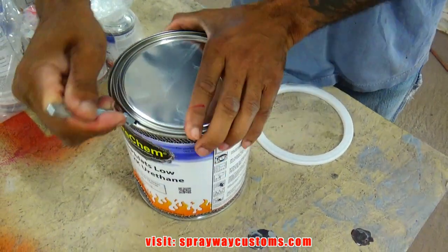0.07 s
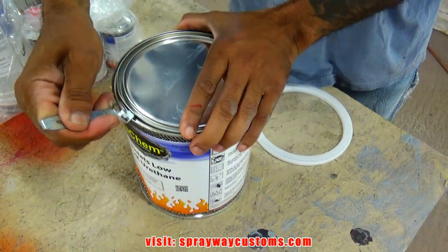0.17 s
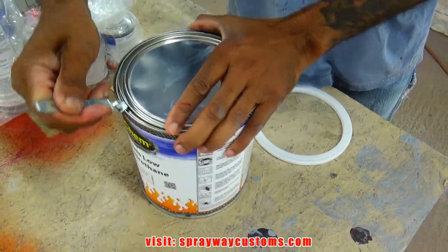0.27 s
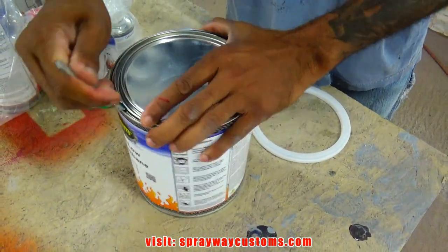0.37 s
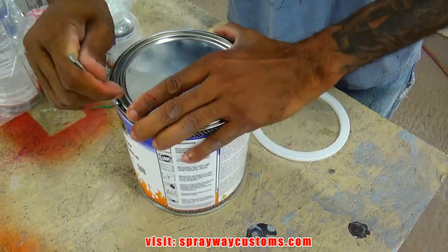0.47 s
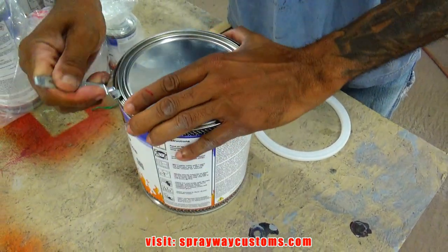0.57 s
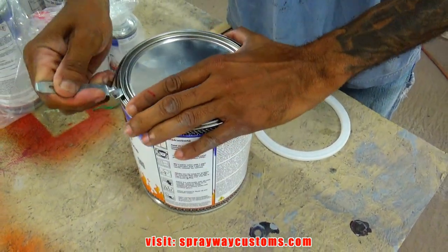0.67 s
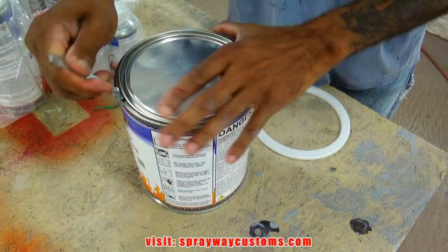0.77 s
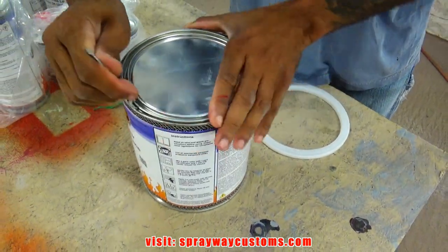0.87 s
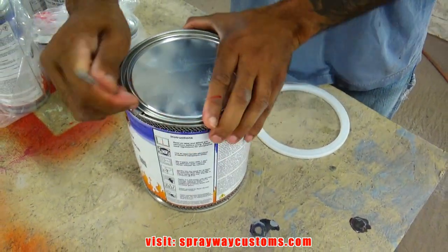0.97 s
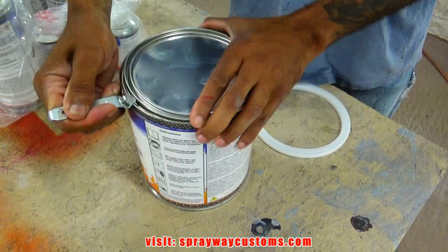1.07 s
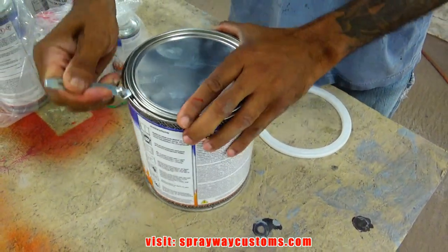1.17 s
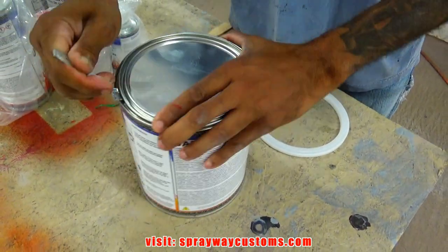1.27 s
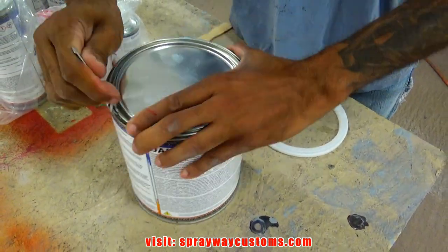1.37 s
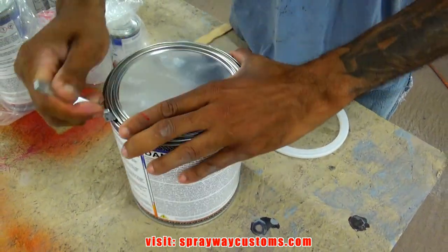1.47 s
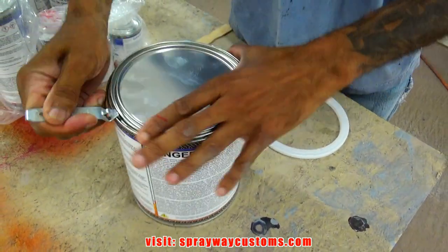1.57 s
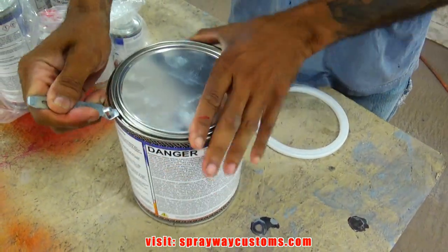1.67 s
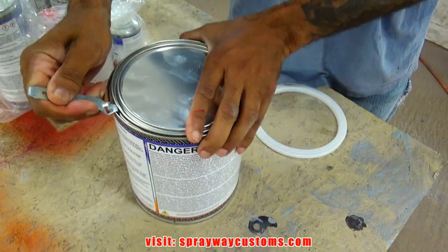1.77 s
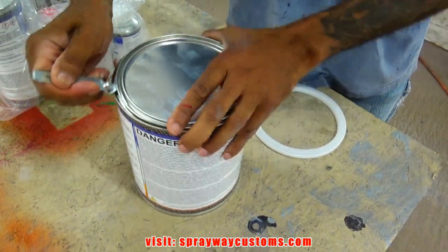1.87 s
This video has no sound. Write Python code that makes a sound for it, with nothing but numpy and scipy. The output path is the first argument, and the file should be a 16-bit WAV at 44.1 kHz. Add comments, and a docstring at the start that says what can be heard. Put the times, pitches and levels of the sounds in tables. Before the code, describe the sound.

Paint can lid pried loose, heard close in a small workshop with steady hiss: short metal scrapes and clicks, a ringing pop, rasping, another drier pop with a sharp squeaky stroke, then can drags and thuds on the bench.

```python
"""A steel opener pries round the rim of a paint can, heard close by in a quiet workshop with steady hiss and hum.
It scrapes (friction grains through resonances), squeaks (narrow noise), ticks (noise cracks with a rim mode)
and bumps the bench (damped sines); then the lid pops loudly (damped modes and a dense clang) under a hand.
More scraping leads to a second loud pop and a brisk stroke; the can drags and bumps on the bench.
Dull knocks of the full can (a blow and damped modes), light ticks and short scrapes end the scene."""
import sys
import numpy as np
from scipy import signal
from scipy.fft import rfft, irfft, next_fast_len
from scipy.io import wavfile

SR = 44100
rng = np.random.default_rng(int(sys.argv[2]) if len(sys.argv) > 2 else 0)


def boost(x):
    """Linear amplitude factor 10**(x/20) for a level x in decibels (scalar or array-like)."""
    u = np.asarray(x, float) / 20
    return 10 ** u


def wav_out(sig):
    """Save sig, one row per channel (or a flat mono array), as 16-bit PCM at SR to the path in sys.argv[1]."""
    wavfile.write(sys.argv[1], SR, np.round(np.clip(np.atleast_2d(sig).T, -1, 1) * 32767).astype(np.int16))


N = 83790

# modes of the lid: (frequency [Hz], level [dB], 60 dB decay time before scaling [s])
LID_MODES = [(547.7, -9, 0.17), (692, 2, 0.12), (729, -17, 0.32), (796, -21, 0.18), (866, -13.5, 0.23),
             (924, -21.5, 0.3), (1094, -17, 0.18), (1145.4, -20.5, 0.2), (1250, -14, 0.14),
             (1400, -13, .12), (1452, -13, 0.11), (1640, -38, 0.13), (1745, -9, 0.079), (1860, -26, 0.13),
             (2014, -15.5, 0.085), (2066, -21.5, 0.15), (2410, -19.5, 0.08)]
CONTACT_RISE_S = 0.00043  # time constant of a steel contact


def unit(x):
    """Normalisation to unit root-mean-square value."""
    return x / np.sqrt(np.mean(x ** 2) + 1e-20)


def along(points, hz):
    """Linear interpolation of (frequency [Hz], value) points on a logarithmic frequency axis."""
    point_hz, values = np.transpose(points)
    return np.interp(np.log(hz + 1), np.log(point_hz + 1), values)


def filtered(x, response):
    """Linear filtering: the spectrum is multiplied by a complex response of frequency."""
    n = x.shape[-1]
    size = next_fast_len(n + 8192)  # zero padding leaves room for the filter's tail
    return irfft(rfft(x, size) * response(np.fft.rfftfreq(size, 1 / SR)), size)[..., :n]


def burst(spectrum, tilt_db, t60, t):
    """Impulsive excitation: coloured noise rises fast and decays exponentially."""
    def colour(hz):
        octaves = np.log2(np.maximum(hz, 600) / 2000)
        return boost(along(spectrum, hz) + tilt_db * octaves)

    noise = filtered(rng.standard_normal(len(t)), colour)
    return unit(noise) * boost(-60 * t / t60) * (1 - np.exp(-t / CONTACT_RISE_S))


def add(track, start_s, sound):
    """Superposition: a sound is summed into the track at its start time."""
    track[round(start_s * SR):][:len(sound)] += sound


def ring(modes, pitch, life, tilt_db, t):
    """Modal synthesis: damped sines started by a short push; the tilt [dB/octave] acts above 692 Hz."""
    tones = 0
    for hz, db, t60 in modes:
        octaves = max(np.log2(hz / 692), 0)
        envelope = boost(db + tilt_db * octaves - 60 * t / (t60 * life))
        tones = tones + envelope * np.sin(2 * np.pi * hz * pitch * t)
    return tones * (1 - np.exp(-t / 0.0011))  # contact time constant [s]


def level(tables, column):
    """Power addition of stroke envelopes, each interpolated in dB and -120 dB outside its stroke."""
    t = np.arange(N) / SR
    power = 0
    for rows in tables:
        times = [row[0] for row in rows]
        levels_db = [row[column] for row in rows]
        power = power + boost(np.interp(t, times, levels_db, -120, -120)) ** 2
    return np.sqrt(power)


def air():
    """Stationary broadband hiss, partly correlated between channels, with a faint tonal hum."""
    # room hiss: (frequency [Hz], relative spectral density [dB])
    hiss_spectrum = [(15, -32), (25, -13), (149, 1.5), (236, -1.5), (285, -5.5), (936, -8.5), (1260, -11),
                     (5280, -16.5), (8140, -15.5), (8830, -13.5), (16000, -29.5)]
    # hum partials: (frequency [Hz], level before a 6 dB cut [dB])
    hum_partials = [(95, -61), (184, -66)]
    hiss_db, correlation = -52.5, 0.93
    common, opposed = filtered(rng.standard_normal((2, N)), lambda hz: boost(along(hiss_spectrum, hz)))
    angle = np.arccos(correlation) / 2
    hiss = np.cos(angle) * common + np.sin(angle) * opposed * [[1], [-1]]
    t = np.arange(N) / SR
    hum = sum(boost(db - 6) * np.sin(2 * np.pi * hz * t) for hz, db in hum_partials)
    return boost(hiss_db) * unit(hiss) + hum


def scrape():
    """Friction: dense random grains excite the resonances of steel, lid and bench."""
    # scraping and dragging strokes: (time [s], treble [dB], middle [dB], lid ring [dB], bench rumble [dB])
    strokes = [
        [(0.0, -50, -51, -36.5, -57), (0.012, -41.5, -38, -42.5, -60), (0.024, -38, -34, -57, -72),
         (0.036, -41, -39, -54, -53), (0.052, -43, -42, -42, -43.5), (0.074, -53, -54, -60, -54),
         (0.086, -49, -54, -68, -63), (0.098, -56, -76, -70, -68), (0.128, -65, -79, -69, -69),
         (0.15, -71, -73, -73, -78)],
        [(0.465, -36, -31, -31, -33), (0.473, -37, -33.5, -35.5, -36), (0.491, -30.5, -34, -32, -42),
         (0.517, -33.5, -32.5, -48, -80), (0.549, -42, -36, -33, -62), (0.563, -49, -46, -48, -70),
         (0.577, -48.5, -47, -59, -75), (0.597, -54, -53, -61, -64), (0.62, -51.5, -59, -53, -68)],
        [(0.8, -85, -83, -66, -65), (0.848, -49, -60, -55, -71), (0.858, -49, -70, -87, -77),
         (0.872, -58, -50, -53, -52), (0.894, -63, -82, -53, -65), (0.902, -42, -39, -46, -43),
         (0.942, -34.5, -42, -57, -102), (0.96, -39, -35, -52, -49), (0.988, -49, -39.5, -37.5, -50),
         (1.018, -48.5, -46.5, -57, -80), (1.05, -44.5, -43.5, -71, -79), (1.074, -62, -56, -51, -48),
         (1.104, -70, -62, -56, -64), (1.12, -60, -46, -56, -33)],
        [(1.183, -45, -33, -37, -61), (1.193, -19.5, -30.5, -38, -35), (1.211, -17, -27, -46, -56),
         (1.232, -43, -41, -52, -40)],
        [(1.232, -37, -36, -66, -41), (1.284, -47.5, -51.5, -65, -56), (1.33, -47.5, -51.5, -49, -55),
         (1.354, -48, -46.5, -49.5, -42), (1.384, -38.5, -37.5, -50, -38.5), (1.402, -39, -40.5, -31, -40.5),
         (1.414, -33.5, -30.5, -45.5, -38), (1.436, -33.5, -35.5, -36.5, -41), (1.472, -35.5, -33.5, -41, -46),
         (1.488, -39.5, -39, -65, -43), (1.504, -38.5, -42, -41.5, -38.5), (1.528, -54, -52, -48, -46),
         (1.55, -47.5, -46, -44.5, -45.5), (1.58, -57, -52, -75, -69)],
        [(1.67, -65, -62, -42.5, -50), (1.684, -58, -72, -58, -59), (1.698, -52, -67, -56, -64),
         (1.712, -55, -65, -51, -63), (1.722, -48.5, -52, -61, -54), (1.74, -37.5, -46, -54, -57),
         (1.752, -42, -46, -55, -58), (1.764, -43, -49.5, -57, -51), (1.778, -50, -88, -63, -58),
         (1.788, -53, -55, -43.5, -50), (1.804, -47, -78, -76, -51)],
        [(1.862, -53, -54, -54, -58), (1.876, -42, -50, -41.5, -49), (1.9, -40, -40.5, -40, -52.5)],
    ]
    # faint scrapes after the pops and knocks: (time [s], treble [dB], middle [dB])
    rustles = [
        [(0.24, -52, -68), (0.272, -67, -76), (0.274, -60, -74), (0.324, -52, -50), (0.332, -65, -45)],
        [(0.355, -64, -40), (0.395, -49, -37), (0.441, -45.5, -40), (0.445, -39, -47)],
        [(1.155, -49, -20), (1.165, -43, -32), (1.183, -41, -31)],
        [(1.6, -60, -41.5), (1.638, -49.5, -49.5), (1.648, -62, -49), (1.67, -59, -61)],
        [(1.835, -52, -48.5), (1.857, -55, -56), (1.862, -47, -61)],
    ]
    # colours of treble, middle and bench rumble: (frequency [Hz], relative spectral density [dB])
    fizz_spectrum = [(2350, -70), (4000, -6.5), (4490, -9), (4900, -2), (6250, -8), (6780, -8.5),
                     (7140, -1.5), (12200, -8), (16000, -30)]
    rasp_spectrum = [(530, -3), (900, 1.5), (1990, 4), (2450, 2), (3950, -1.5), (4800, -4.5), (6240, -79),
                     (10600, -120)]
    drone_spectrum = [(59, -55), (100, -14), (172, -2.5), (402, -12.5), (480, -3), (620, -5.5),
                      (1060, -120)]
    # resonances of rim and tool: (frequency [Hz], width [Hz], level before the common gain [dB])
    steel_modes = [(1680, 4.3, 6), (3127, 160, -4.5), (4670, 71, -21), (6070, 63, 0), (6620, 29, 7),
                   (8040, 130, -3), (8180, 110, -14), (8900, 180, -2.5), (10350, 190, -10)]
    steel_db, rasp_ring_db = 3, 4.5  # common gain of the steel modes; lid modes in the rasp
    grains_per_s, grain_spread_db = 6000, 2
    rub_widens = 4.3  # the hand on the lid broadens its modes

    def peak(hz, centre, width):
        return width * np.abs(hz / (centre ** 2 - hz ** 2 + 1j * hz * width))

    def steel(hz):
        return 1 + boost(steel_db) * sum(boost(db) * peak(hz, c, width) for c, width, db in steel_modes)

    def lid_response(hz):
        total = 0
        for centre, db, t60 in LID_MODES:
            width = rub_widens * np.log(1000) / np.pi / t60
            total = total + boost(db) * peak(hz, centre, width) ** 2
        return total

    def coloured(source, spectrum):
        return unit(filtered(source, lambda hz: boost(along(spectrum, hz)) * steel(hz)))

    hits = rng.random((4, N)) < grains_per_s / SR
    sizes = boost(grain_spread_db * rng.exponential(size=N)) * rng.standard_normal(N)
    grains = hits * sizes
    grains = grains + grains.std() * rng.standard_normal((4, N))  # equally strong even hiss
    fizz = coloured(grains[0], fizz_spectrum)
    rasp = coloured(grains[1], rasp_spectrum)
    drone = coloured(grains[2], drone_spectrum)
    rasp = unit(filtered(rasp, lambda hz: 1 + boost(rasp_ring_db) * np.sqrt(lid_response(hz))))
    rub = unit(filtered(grains[3], lid_response))
    bright = fizz * level(strokes + rustles, column=1) + rasp * level(strokes + rustles, column=2)
    return bright + rub * level(strokes, column=3) + drone * level(strokes, column=4)


def squeaks():
    """Resonant friction: one narrow noise band swells and fades while the tool slides."""
    # squeaks: (centre [s], length [s], frequency [Hz], width [Hz], level at the centre [dB])
    squeak_bands = [(0.015, 0.038, 9430, 295, -41), (0.519, 0.059, 5650, 348, -35),
                    (0.982, 0.02, 4730, 250, -45), (1.023, 0.075, 9150, 500, -46),
                    (1.205, 0.033, 6650, 246, -20.5), (1.202, 0.018, 7700, 250, -30),
                    (1.42, 0.043, 8180, 300, -31.5), (1.43, 0.061, 4670, 250, -35.5),
                    (1.472, 0.032, 1680, 100, -34.5), (1.763, 0.059, 1296, 79.6, -50)]
    t = np.arange(N) / SR
    out = np.zeros(N)
    for centre_s, length_s, hz, width, db in squeak_bands:
        noise = rng.standard_normal(N)
        band = unit(filtered(noise, lambda f: 1 / (1 + (2 * (f - hz) / width) ** 2)))
        out += boost(db) * band * np.exp(-2 * ((t - centre_s) / (length_s / 2)) ** 2)
    return out


def shop(x):
    """Reverberation: convolution with decaying noise in which each frequency dies at its own speed."""
    # decay of the workshop: (frequency [Hz], 60 dB decay time [s])
    decay = [(200, 0.14), (2000, 0.52), (10000, 0.15)]
    hz, t, bins = signal.stft(rng.standard_normal((2, SR // 2)), SR, nperseg=256)
    fade = boost(-60 * t / along(decay, hz)[:, None])
    tail = signal.istft(bins * fade, SR, nperseg=256)[1]
    tail = tail / np.linalg.norm(tail[0])
    delayed = np.pad(x, (300, 0))  # delay in samples
    return signal.fftconvolve(delayed[None], tail, axes=1)[:, :N]


def opener():
    """Impact of steel on steel: short bright noise cracks, each with one damped mode of the rim."""
    # ticks: (time [s], level before a 7.5 dB cut [dB], crack decay [s], brightness [dB/octave], rim mode [Hz])
    ticks = [(0.0226, -20, 0.024, -2, 1426), (0.036, -20, 0.016, 21, 1480),
             (0.1785, -24.5, 0.028, -3.5, 3550), (0.195, -12.5, 0.013, -5, 1824),
             (0.22, -18.5, 0.019, -5.5, 1390), (0.277, -35, 0.013, 2, 7860), (0.32, -33, 0.011, 9, 7500),
             (.345, -1, 0.017, -6, 2220), (0.4474, -10.5, 0.023, -3.3, 1770),
             (0.4552, -0.5, 0.017, 2, 8900), (0.6314, -25.5, 0.014, -3.5, 1680),
             (0.662, -19, 0.011, 7, 3010), (0.732, -32.5, 0.013, -1, 6700),
             (0.838, -30.5, 0.016, 0.5, 9130), (.872, -31.5, 0.014, 7, 4450),
             (0.9024, -20.5, 0.028, 2.5, 5940), (.976, -24, 0.045, 2, 4750), (1.0447, -28, 0.014, 1, 11800),
             (1.077, -32.5, 0.017, -7, 9700), (1.124, -25, 0.025, 2, 1660),
             (1.1463, -2.5, 0.026, -4.5, 2920), (1.5052, -18, 0.0065, -3.5, 3190),
             (1.5857, -17, 0.0055, -4, 1285), (1.5897, -22.5, 0.044, -2.5, 2820),
             (1.6091, -16.5, 0.011, -6, 1330), (1.722, -27, 0.01, 5, 2300), (1.735, -23, 0.016, 3.5, 2600),
             (1.8265, -18.5, 0.0078, -4, 1236), (1.8753, -31, 0.012, -1.5, 1150)]
    # colour of a crack: (frequency [Hz], relative spectral density [dB])
    crack_spectrum = [(300, -42), (650, -18), (1100, -8), (2880, -10), (3940, -7), (4880, -14.5),
                      (9040, -7.5), (10100, -10), (10900, -10), (16000, -34)]
    rim_db, rim_t60_s = -7, 0.033
    out, t = np.zeros(N + SR), np.arange(SR // 10) / SR
    for start_s, db, t60, tilt_db, hz in ticks:
        rim = boost(rim_db - 60 * t / rim_t60_s) * np.sin(2 * np.pi * hz * t)
        crack = burst(crack_spectrum, tilt_db, t60, t)
        add(out, start_s, boost(db - 7.5) * (crack + rim))
    return out[:N]


def knocks():
    """Impact on a heavily damped body: one short blow with the decaying modes of the full can."""
    # knocks: (time [s], level [dB], pitch factor, ring length factor, blow level relative to the ring [dB])
    can_knocks = [(.039, -32, 0.835, 0.43, -10), (1.587, -36, 1.02, 0.44, -8),
                  (1.608, -30.5, 1.1, 0.56, -3), (1.632, -22, .86, 0.42, -16),
                  (1.8244, -26.5, 0.95, 0.82, 20)]
    # modes of the full can: (frequency before scaling [Hz], level [dB], 60 dB decay time before scaling [s])
    can_modes = [(225, -9.5, .12), (480, 0, 0.088), (583, 0.5, 0.17), (756, -3.5, 0.097),
                 (1260, -13.5, 0.12)]
    blow_hz, blow_t60_s = 810, 0.0044
    out, t = np.zeros(N + SR), np.arange(SR // 4) / SR
    blow = -boost(-60 * t / blow_t60_s) * np.sin(2 * np.pi * blow_hz * t)
    blow = blow * (1 - np.exp(-t / CONTACT_RISE_S))
    for start_s, db, pitch, life, blow_db in can_knocks:
        body = ring(can_modes, pitch, life, 0, t)
        add(out, start_s, boost(db) * (body + boost(blow_db) * blow))
    return out[:N]


def bench():
    """Soft impact: the can excites damped low modes of the board with a gradual onset."""
    # bumps of the can on the bench: (time [s], level [dB])
    bumps = [(0.043, -32.5), (0.223, -29.5), (0.387, -33.5), (0.459, -24), (0.546, -38), (0.963, -34.5),
             (1.214, -55), (1.373, -29), (1.42, -21.5), (1.826, -38.5)]
    # modes of the board: (frequency [Hz], level [dB], 60 dB decay time before scaling [s])
    board_modes = [(173.4, -6.5, 0.15), (279.6, 0, 0.064)]
    out, t = np.zeros(N + SR), np.arange(SR // 4) / SR
    thud = ring(board_modes, 1, 0.77, 0, t) * (1 - np.exp(-t / 0.0034))  # onset [s]
    for start_s, db in bumps:
        add(out, start_s, boost(db) * thud)
    return out[:N]


def lid():
    """Plate vibration: each row rings damped modes over a dense clang; the grip shifts the main mode only."""
    # pops and knocks of the lid, and later swells of its ring, one lower in pitch:
    # (time [s], level before a 6.5 dB cut [dB], main mode [Hz],
    # ring length factor, brightness [dB/octave], clang level relative to the modes [dB])
    pops = [(.194, -22.5, 692, 0.68, 6, -2.5), (.222, -8, 694, 0.88, -3, -24),
            (.346, 1.5, 694, 1.22, 2, -11.5), (.3687, -5.5, 692, 0.45, 5.5, -20),
            (.378, -8.5, 655, 1.22, -11, -10), (.533, -28.5, 722, 0.81, -2, -15),
            (.544, -23.5, 712, 0.8, -7, -19), (.631, -34.5, 704, 1.4, 3, -0.5),
            (.662, -23, 688, 0.58, 8.5, -4), (.688, -11, 685, 0.67, -12.5, -19.5),
            (.903, -26.5, 667, 0.73, 5.5, -17), (.951, -27, 674, 0.87, -6.5, 3),
            (1.076, -37, 679, 0.91, -7, 0), (1.126, -21, 657, 0.49, 3.5, -3),
            (1.1473, 3, 665.5, 0.46, 2.5, -14.5), (1.161, -11, 670, 0.36, 4.5, -7)]
    # dense unresolved ring: (frequency [Hz], relative spectral density [dB])
    clang_spectrum = [(560, -15), (1000, -15.5), (1500, -10), (1870, -4), (2030, -13), (2220, -11),
                      (2420, -12.5), (5310, -41), (8000, -38), (10400, -52), (17600, -120)]
    clang_t60_s = 0.13  # before the ring length factor
    out, t = np.zeros(N + SR), np.arange(SR // 3) / SR
    for start_s, db, main_hz, life, tilt_db, clang_db in pops:
        modes = [LID_MODES[0], (main_hz, *LID_MODES[1][1:]), *LID_MODES[2:]]
        tones = ring(modes, 1, life, tilt_db, t)
        clang = burst(clang_spectrum, tilt_db, clang_t60_s * life, t)
        add(out, start_s, boost(db - 6.5) * (tones + boost(clang_db) * clang))

    def radiation(hz):
        ratio = 1j * hz / 393  # the lid radiates little below its first mode
        return (ratio ** 2 / (1 + ratio + ratio ** 2)) ** 2

    return filtered(out[:N], radiation)


def scene():
    """Superposition of the direct sound, with phase and level differences at two ports, its echo and the air."""
    # phase between the two ports: (frequency [Hz], lead of the left port [rad])
    port_phase = [(0, -1.84), (860, 0.64), (4650, 0.2), (6980, 0.39), (16200, -0.16)]
    # balance of the ports: (frequency [Hz], left minus right [dB])
    port_balance = [(60, 2), (240, -0.5), (950, 0.5), (3770, 0.4), (8500, 0.9), (15000, 0)]
    low_cut_hz, room_db = 59, -20
    can = scrape() + squeaks() + opener() + knocks() + bench() + lid()
    can = filtered(can, lambda hz: (1j * hz / (low_cut_hz + 1j * hz)) ** 2)
    side = np.array([[.5], [-.5]])  # left, right

    def port_response(hz):
        return boost(side * along(port_balance, hz)) * np.exp(1j * side * along(port_phase, hz))

    ports = filtered(can, port_response)
    return ports + boost(room_db) * shop(can) + air()


def top_cut(x):
    """Nothing passes above the cut-off."""
    return signal.sosfilt(signal.butter(12, 16650, fs=SR, output="sos"), x)


def record(dry):
    """Amplitude modulation and saturation: the level dips briefly, then peaks are softly clipped."""
    dip_start_s, dip_end_s, dip_db = 0.326, 0.3445, -8.5
    dip_times = [dip_start_s - 0.001, dip_start_s, dip_end_s, dip_end_s + 0.0011]
    dip = boost(np.interp(np.arange(N) / SR, dip_times, [0, dip_db, dip_db, 0]))
    x = dry * dip
    mix = x / (1 + np.abs(x) ** 8) ** (1 / 8)
    return top_cut(mix)


dry = scene()
out = record(dry)
wav_out(out)
```